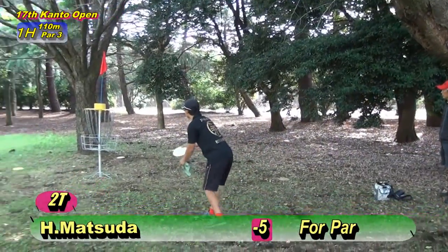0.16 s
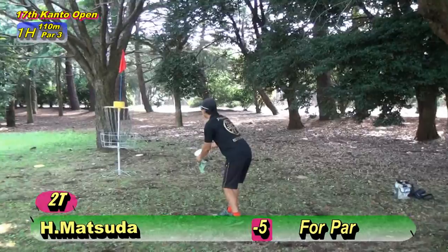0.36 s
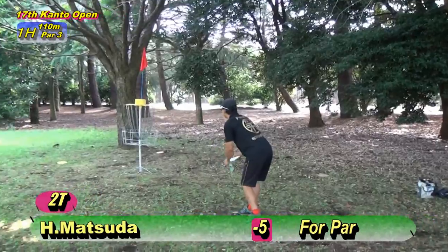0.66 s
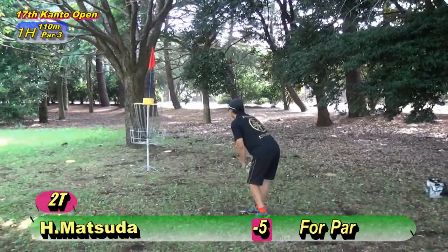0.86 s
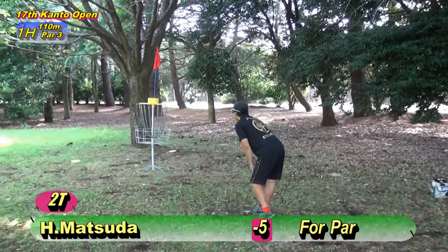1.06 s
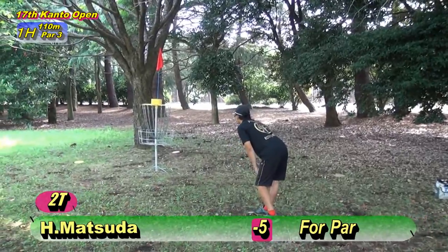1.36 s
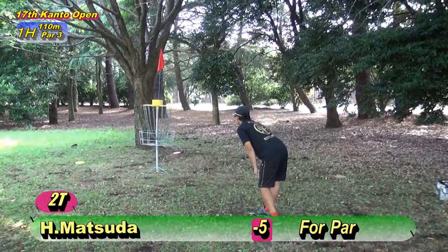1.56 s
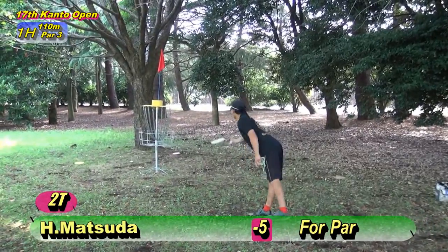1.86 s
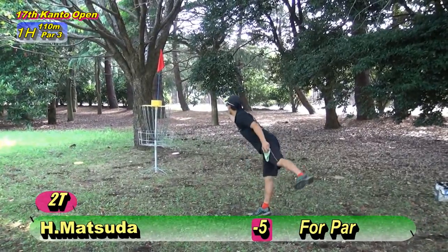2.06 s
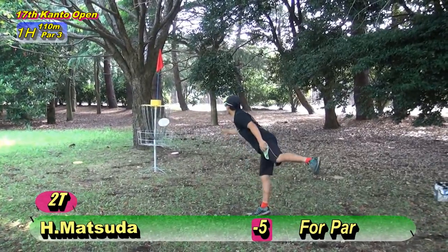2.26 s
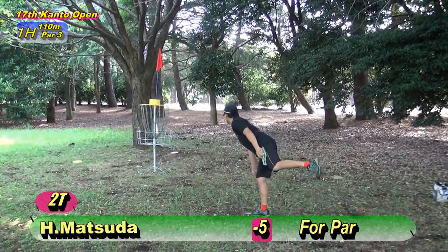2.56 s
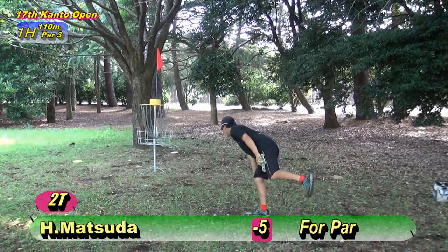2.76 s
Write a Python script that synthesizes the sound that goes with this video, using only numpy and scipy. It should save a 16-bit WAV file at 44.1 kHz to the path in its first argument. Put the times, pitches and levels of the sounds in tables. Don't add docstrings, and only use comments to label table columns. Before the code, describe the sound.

A disc hits a basket's metal chains at about 2.23 s: a dull plastic knock and loud, bright jangle, a ringing steel hoop near 2.32, another clatter around 2.5, then sparse clinks fading to 2.9. Before it, a high, raspy cicada buzz slides steadily lower and continues underneath, with soft traffic hum, leafy hiss, and faint shoe and sleeve rustles around 1.7-2.0 s. Open wooded park, short tree reflections.

```python
import sys
import numpy as np
from scipy import signal
from scipy.fft import rfft, irfft, next_fast_len
from scipy.io import wavfile
from scipy.ndimage import map_coordinates

SR = 44100
rng = np.random.default_rng(int(sys.argv[2]) if len(sys.argv) > 2 else 0)


def voltage_ratio(level):
    return 10 ** (np.asarray(level, float) / 20)


def unload_wav(signal):
    wavfile.write(
        sys.argv[1],
        SR,
        np.round(np.clip(np.atleast_2d(signal).T, -1, 1) * 32767).astype(np.int16),
    )


N = 127890
T = np.arange(N) / SR


def unit(x):
    return x / np.sqrt(np.mean(x ** 2) + 1e-20)


def along(points, hz):
    f, v = np.transpose(points)
    return np.interp(np.log(hz + 1), np.log(f + 1), v)


def wobble(rate_hz):
    knots = rng.standard_normal(int(N * rate_hz / SR) + 4)
    return map_coordinates(knots, [T * rate_hz])


def filtered(x, response):
    m = next_fast_len(x.shape[-1] + 8192)
    spectrum = rfft(x, m) * response(np.fft.rfftfreq(m, 1 / SR))
    return irfft(spectrum, m)[..., :x.shape[-1]]


def ring(blows, hz, t60_s):
    r = 10 ** (-3 / (t60_s * SR))
    w = 2 * np.pi * hz / SR
    return signal.lfilter([0, np.sin(w)], [1, -2 * r * np.cos(w), r * r], blows)


def add(track, start_s, sound):
    part = track[round(start_s * SR):][:len(sound)]
    part += sound[:len(part)]


def spread(pair, alike):
    turn = lambda hz: np.arccos(np.clip(along(alike, hz), -1, 1)) / 2
    mid, side = filtered(pair, lambda hz: np.array([np.cos(turn(hz)), np.sin(turn(hz))]))
    return np.array([mid + side, mid - side])


def park():
    # freq_hz, density_db
    hum_bands = [(25, -15), (43, -18), (75, 0.5), (95, -4), (125, -2), (155, -6), (184, -3), (352, -17.5)]
    # freq_hz, density_db
    air_bands = [(300, -7), (500, 3), (800, -1), (1300, -7), (2500, -15), (5500, -19), (10500, -18.5),
                 (15500, -20.5)]
    # freq_hz, likeness
    park_alike = [(60, 0.92), (200, 0.95), (640, 0.91), (1200, 0.95), (2200, 0.99), (5000, .985),
                  (9000, 0.9)]
    # freq_hz, lean_db
    lean = [(60, -2.5), (130, 5.0), (290, 7.5), (640, 6), (1400, 3.5), (3070, -0.5), (6750, 0.5),
            (14800, -5)]

    def noise(bands):
        closed = [(8, -70)] + list(bands) + [(bands[-1][0] * 2, -60)]
        return unit(filtered(rng.standard_normal((2, N)), lambda hz: voltage_ratio(along(closed, hz))))

    hum = noise(hum_bands) * voltage_ratio(-46.5 + 1.13 * wobble(3.29))
    air = noise(air_bands) * voltage_ratio(-55.5 + 0.29 * wobble(5.0))
    return filtered(spread(hum + air, park_alike), lambda hz: voltage_ratio(np.outer([.5, -.5], along(lean, hz))))


def cicada():
    # time_s, body_hz, level_db, rib_gap_ms
    song = [
        (0, 8640, -45, 2.1),
        (.5, 8560, -45.5, 1.97),
        (1.1, 8080, -45.5, 2.14),
        (1.7, 7740, -45.5, 2.02),
        (2.2, 7150, -45.5, 1.9),
        (2.68, 7000, -45, 1.875),
        (2.9, 6950, -45, 1.875),
    ]
    buckles_per_s, click_s, pitch_spread, size_db = 3500, 0.00043, 0.046, -0.5
    upper_ratio, upper_db, upper_spread = 1.33, -18.5, .1
    alike, pan_db = 0.43, 1.8
    s, hz, db, gap_ms = np.transpose(song)
    count, t = int(buckles_per_s * N / SR), T[:64]
    rib_loss_db = 9.5 - 1 * T - 7 * np.maximum(T - 2.48, 0)
    gap = np.interp(T, s, gap_ms) * SR / 1000
    paths = []
    for _ in range(2):
        at, draw = rng.integers(0, N, count), rng.standard_normal((count, 3))
        pitch_hz = np.interp(at / SR, s, hz) * np.exp(pitch_spread * draw[:, 0])
        turn = 2 * np.pi * pitch_hz[:, None] * t
        upper = np.sin(turn * upper_ratio * np.exp(upper_spread * draw[:, 2:]))
        body = np.sin(turn) + voltage_ratio(upper_db) * upper
        envelope = (t / click_s) ** 2 * np.exp(-2 * t / click_s)
        clicks = voltage_ratio(size_db * draw[:, 1:2]) * envelope * body
        places = at[:, None] + np.arange(len(t))
        first = np.bincount(places.ravel(), clicks.ravel(), N)[:N]
        ribs = 0
        for rib in range(4):
            ribs = ribs + voltage_ratio(-rib_loss_db * rib) * map_coordinates(first, [np.arange(N) - rib * gap])
        paths.append(unit(ribs))
    level = voltage_ratio(np.interp(T, s, db) + 0.69 * wobble(12))
    return level * spread(np.array(paths), [(7000, alike)]) * voltage_ratio([[pan_db / 2], [-pan_db / 2]])


def knocks():
    # start_s, rms_db, centre_hz, width_octaves, t60_s
    bursts = [(2.237, -28, 1930, .12, 0.04), (2.298, -34, 900, 0.5, 0.05), (2.311, -37, 900, .5, .04),
              (2.238, -36.5, 925, 0.25, 0.099), (2.316, -28.5, 4700, 1, 0.13),
              (2.47, -42.5, 1200, 0.73, 0.095), (2.485, -44, 4500, .8, .08), (2.503, -38, 5000, .7, .1),
              (2.511, -35, 4800, 1.26, 0.15), (2.617, -44, 2000, 1, .1), (2.628, -38, 2800, 1.1, 0.25),
              (2.665, -44, 2600, 1, .15), (2.635, -42, 2060, 0.028, 0.13), (2.628, -42.5, 4560, .12, 0.078),
              (2.63, -48.5, 1500, 0.078, 0.24), (2.335, -28, 4500, 1.1, 0.3), (2.70, -44, 2800, 1.2, 0.3),
              (1.72, -51.5, 1500, 0.9, .12), (1.868, -43, 815, 0.7, 0.07), (1.735, -50, 300, .6, .08),
              (1.871, -51, 2200, .8, 0.05), (1.885, -58, 2600, .7, .12), (1.915, -60, 2300, .8, .08),
              (1.979, -51, 1700, 0.46, 0.028), (.26, -59, 2500, 1, 0.085), (1.65, -62, 3700, .4, 0.066)]
    attack_s = 0.00041
    out, t = np.zeros(N), T[:SR // 5]
    for s, db, centre_hz, octaves, t60_s in bursts:
        band = lambda hz: np.exp(-.5 * (np.log2((hz + 1) / centre_hz) / octaves) ** 2)
        noise = unit(filtered(rng.standard_normal(len(t)), band))
        add(out, s, noise * voltage_ratio(db - 60 * t / t60_s) * (1 - np.exp(-t / attack_s)))
    return out


def chains():
    # time_s, level_db
    shaking = [
        (2.232, -90.5),
        (2.233, -33),
        (2.255, -25.5),
        (2.29, -30.5),
        (2.33, -32),
        (2.39, -31.5),
        (2.46, -39.5),
        (2.638, -41),
        (2.75, -47.5),
        (2.9, -51),
    ]
    link_hz = [11345, 11385, 11440, 11560, 11585, 11650, 11905, 12325, 12595, 12650, 12705, 13610, 13780,
               13880]
    # level_db, t60_s
    links = [(-6, 0.23), (-11, .15), (-11, .18), (-1, .2), (0, .2), (-7, .2), (-15, .13), (-21, .14),
             (-11, .14), (-7, .14), (-10, .14), (-11, .08), (-12, .08), (-15, .08)]
    # start_s, peak_db, pitch_hz, t60_s
    clinks = [(2.2359, -13.5, 12000, 0.037), (2.2493, -11.5, 11900, 0.047), (2.308, -25, 11600, 0.046),
              (2.3467, -13, 11600, 0.054), (2.378, -15, 11630, 0.079), (2.486, -22, 11800, 0.035),
              (2.5046, -16.5, 11600, 0.054), (2.5381, -20, 11420, 0.044), (2.5695, -27, 11700, 0.037),
              (2.5964, -28.5, 9000, 0.023), (2.6184, -25, 12800, 0.036), (2.6192, -22, 11660, 0.043),
              (2.627, -30, 9200, 0.031), (2.6402, -26.5, 11500, 0.035), (2.666, -40, 11700, .05),
              (2.7233, -18, 11650, 0.037), (2.7282, -24, 11650, 0.022), (2.777, -31, 12750, .04),
              (2.776, -32, 11600, 0.065), (2.83, -36, 11600, 0.055), (2.888, -32.5, 11400, 0.055),
              (2.889, -36, 12740, .06), (1.585, -49.5, 12000, .04)]
    # freq_hz, level_db, t60_s
    wires = [(3130, -7.5, 0.13), (3313, -2, 0.12), (3790, -12, .12), (4040, -5, 0.093), (4300, -8, .15),
             (4728, -5.5, 0.14), (5020, -6, .12), (5260, -9, .15), (5534, -1, 0.1), (5830, -5.5, .15),
             (6074, -2.5, 0.12), (6300, -8, .12), (9040, 7, .1), (9600, 6, .1)]
    # freq_hz, density_db
    rattle_bands = [(450, -16.5), (900, -5.5), (2000, -5.5), (3000, -3), (6000, -7), (12000, 3),
                    (14300, -8.5), (15400, -18.5)]
    touches_per_s, touch_db, clink_spread, attack_s = 350, 5.5, 0.0111, 0.00075
    link_db, clink_ring_db, wire_db, rattle_db = 1, -15.5, -13.5, -2.5
    s, db = np.transpose(shaking)
    shake = voltage_ratio(np.interp(T, s, db) + 1.7 * wobble(45))

    def touches(rate):
        hits = (rng.random(N) < rate / SR) * rng.standard_normal(N)
        return hits * voltage_ratio(touch_db * rng.standard_normal(N))

    out, t = np.zeros(N), T[:SR // 8]
    for hz, (level_db, t60_s) in zip(link_hz, links):
        blows = 0.31 * shake * unit(touches(touches_per_s)) * np.sqrt(touches_per_s / SR)
        for at, peak_db, pitch_hz, _ in clinks[:-1]:
            detune_db = 60 * abs(np.log(hz / pitch_hz))
            blows[round(at * SR)] += voltage_ratio(peak_db + clink_ring_db - detune_db) * rng.normal()
        out += voltage_ratio(link_db + level_db) * ring(blows, hz, t60_s)
    for at, peak_db, pitch_hz, t60_s in clinks:
        near_hz = pitch_hz * np.exp(clink_spread * rng.standard_normal(size=(4, 1)))
        tones = np.sin(2 * np.pi * (near_hz * t + rng.random(size=(4, 1)))).sum(axis=0)
        add(out, at, voltage_ratio(peak_db - 7 - 60 * t / t60_s) * (1 - np.exp(-t / attack_s)) * tones)
    wire_sum = np.zeros(N)
    for hz, level_db, t60_s in wires:
        wire_sum += voltage_ratio(level_db) * unit(ring(touches(touches_per_s), hz, t60_s))
    out += voltage_ratio(wire_db) * shake * unit(wire_sum)
    grit = unit(touches(7000) + 1.05 * rng.standard_normal(N))
    rattle = unit(filtered(grit, lambda hz: voltage_ratio(along(rattle_bands, hz))))
    return out + voltage_ratio(rattle_db) * shake * rattle


def disc():
    # freq_hz, level_db, t60_s
    disc_modes = [(900, -13.5, 0.034), (1460, -18, 0.034), (1910, -4.5, 0.071), (2160, -5, 0.023),
                  (3100, -8.5, 0.028), (3970, -11, 0.025), (4270, -9, 0.028), (4990, -11, 0.035),
                  (5910, -17, .03)]
    # start_s, level_db
    disc_blows = [
        (2.2333, -25.5),
        (2.2356, -29.5),
        (2.2378, -28),
        (2.2545, -38),
        (2.259, -37),
    ]
    blows = np.zeros(N)
    for s, db in disc_blows:
        blows[round(s * SR)] = voltage_ratio(db)
    return sum(voltage_ratio(level_db) * ring(blows, hz, t60_s) for hz, level_db, t60_s in disc_modes)


def hoop():
    hoop_hz = [2500, 2575, 2638, 7098, 7150, 7205, 7480, 9050]
    # level_db, t60_s
    hoop_modes = [(-17, .1), (-10, .17), (-9, .17), (-3, .36), (-1, .24), (-5, .18), (-9, .15), (-34, .3)]
    # start_s, level_db, low_over_high_db
    hoop_blows = [
        (2.316, -38, 14.5),
        (2.3225, -19.5, -5),
        (2.505, -36, 5),
        (2.629, -47, 3),
        (2.701, -45, -7),
    ]
    hum_pair_hz = (2533.6, 2536.3)
    flutter_db, hum_db, hum_second_db, hum_t60_s = 2.5, -37, -1.5, 1.3
    damped_s, damping_db_per_s = 2.76, 150
    out = np.zeros(N)
    for hz, (level_db, t60_s) in zip(hoop_hz, hoop_modes):
        blows = np.zeros(N)
        for s, db, low_db in hoop_blows:
            blows[round(s * SR)] = voltage_ratio(db + level_db + low_db * (hz < 4000))
        sign = -1 if 7120 < hz < 7180 else 1
        out += sign * ring(blows, hz, t60_s) * voltage_ratio(flutter_db * wobble(35))
    main = np.arange(N) == round(hoop_blows[1][0] * SR)
    hum = sum(voltage_ratio(hum_db + db) * ring(main, hz, hum_t60_s) for hz, db in zip(hum_pair_hz, (0, hum_second_db)))
    out += hum * voltage_ratio(2.5 * wobble(40))
    out *= voltage_ratio(-damping_db_per_s * np.maximum(T - damped_s, 0))
    return filtered(out, lambda f: sum(np.exp(-((f - hz) / 500) ** 2) for hz in (2570, 7150, 8900)))


def trees(x):
    # freq_hz, t60_s
    decay = [(500, 0.31), (4000, 0.37), (14000, 0.3)]
    # freq_hz, likeness
    trees_alike = [(1000, 1), (2500, 0.98), (5000, 0.77), (7000, 0.19), (11000, 0.9)]
    hz, t, z = signal.stft(rng.standard_normal((2, SR // 2)), SR, nperseg=256)
    tail = signal.istft(z * voltage_ratio(-60 * t / along(decay, hz)[:, None]), SR, nperseg=256)[1]
    tail = spread(tail / np.linalg.norm(tail[0]), trees_alike)
    delayed = np.pad(x, (200, 0))
    return signal.fftconvolve(delayed[None], tail, axes=1)[:, :N]


def scene():
    pan_db, trees_db = 0.78, -9.5
    basket = chains() + hoop() + knocks() + disc()
    direct = basket * voltage_ratio([[pan_db], [-pan_db]])
    return direct + voltage_ratio(trees_db) * trees(basket) + cicada() + park()


def low_pass(x):
    return signal.sosfilt(signal.butter(12, 15200, fs=SR, output="sos"), x)


def record(dry):
    return low_pass(dry)


dry = scene()
out = record(dry)
unload_wav(out)
```